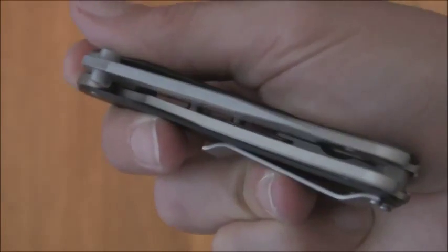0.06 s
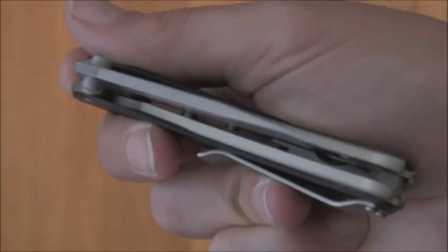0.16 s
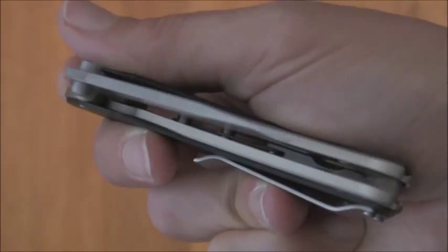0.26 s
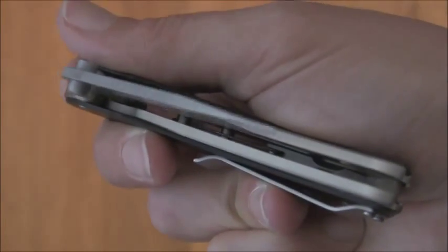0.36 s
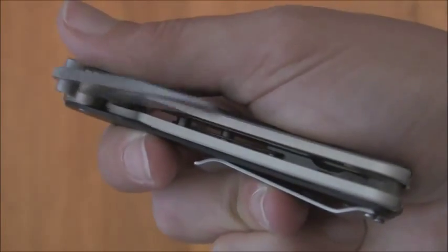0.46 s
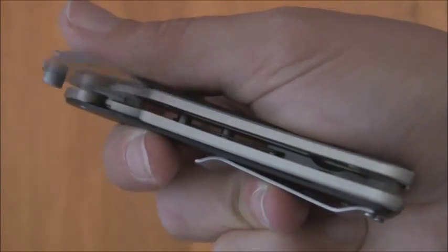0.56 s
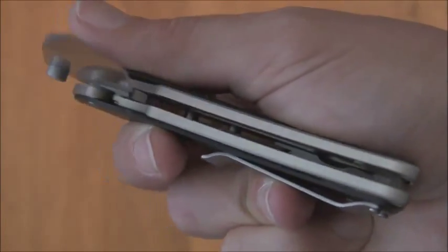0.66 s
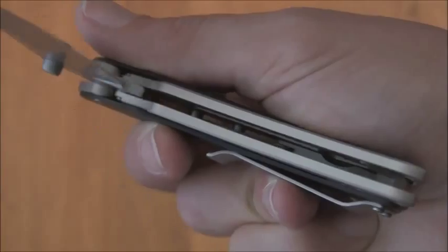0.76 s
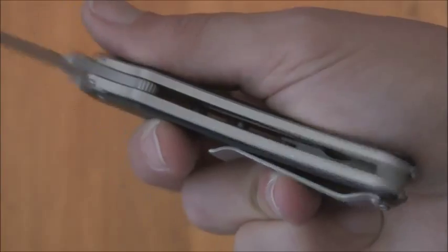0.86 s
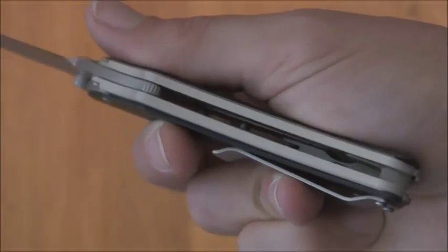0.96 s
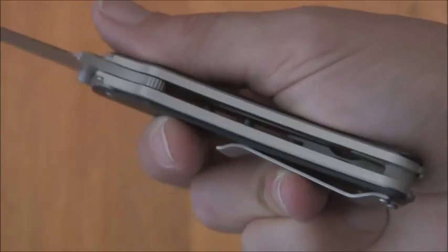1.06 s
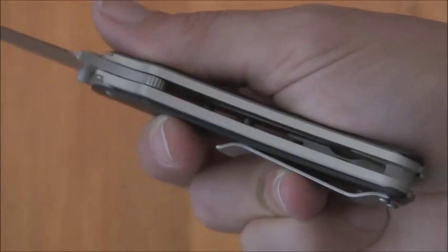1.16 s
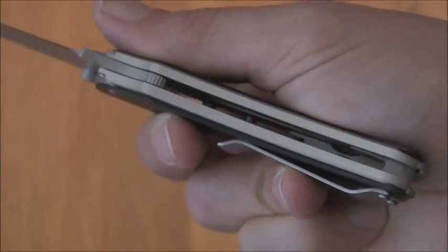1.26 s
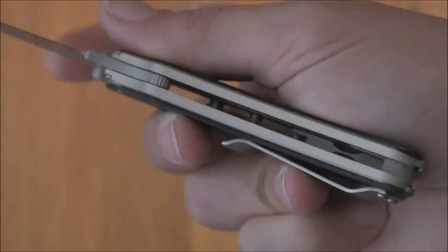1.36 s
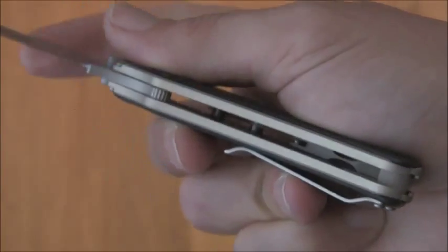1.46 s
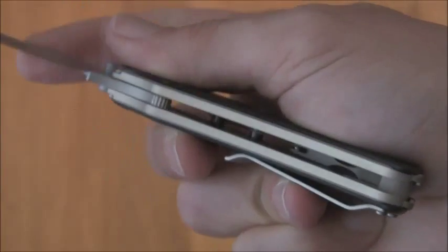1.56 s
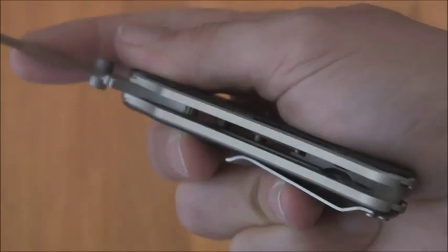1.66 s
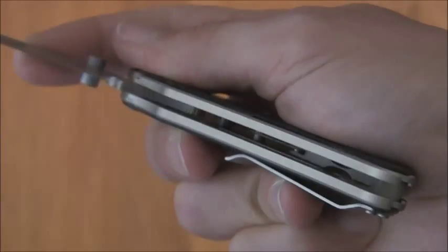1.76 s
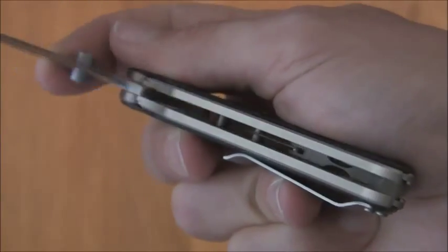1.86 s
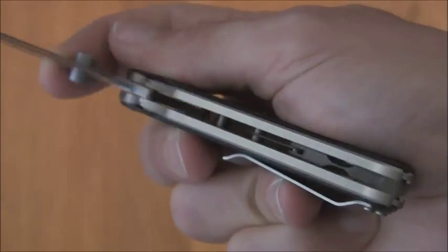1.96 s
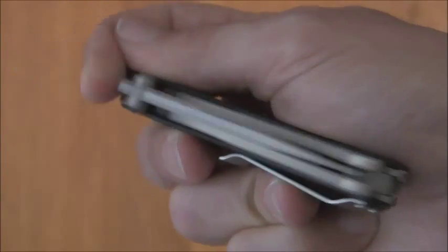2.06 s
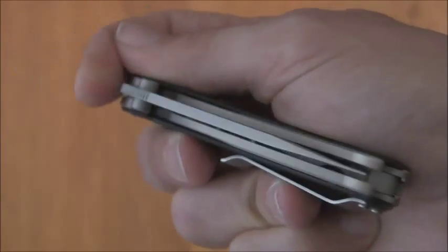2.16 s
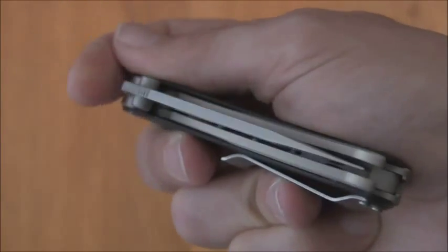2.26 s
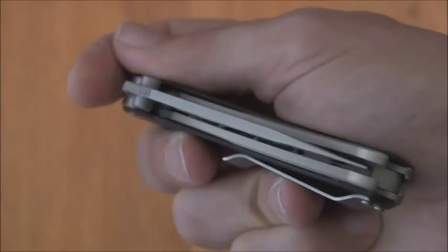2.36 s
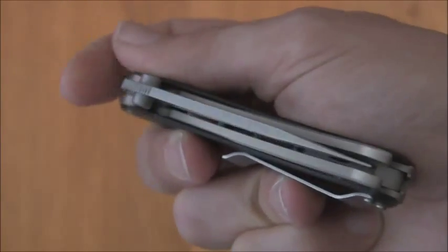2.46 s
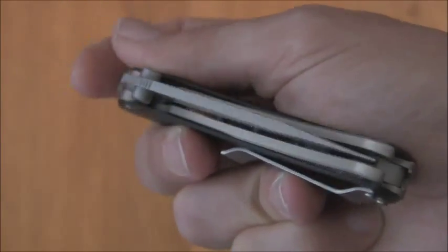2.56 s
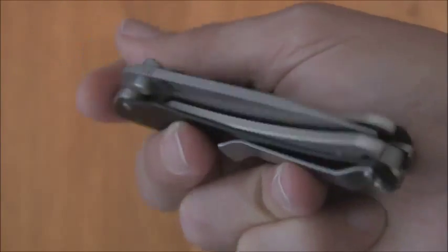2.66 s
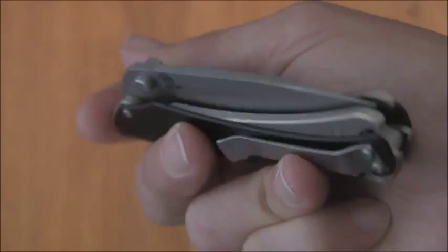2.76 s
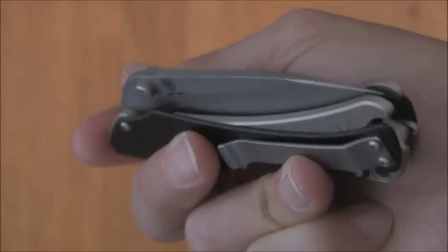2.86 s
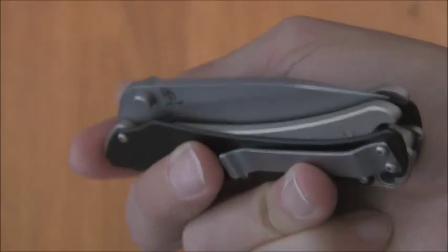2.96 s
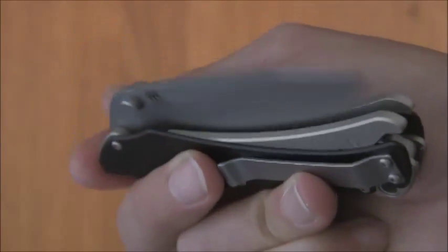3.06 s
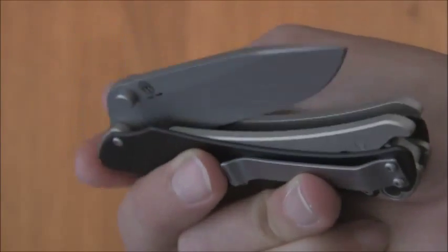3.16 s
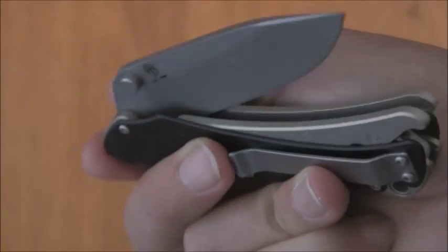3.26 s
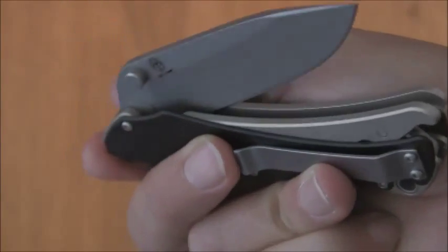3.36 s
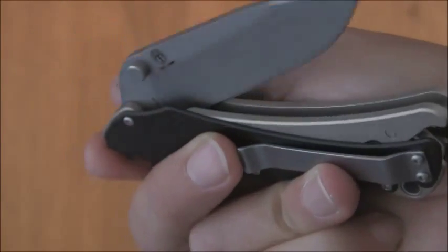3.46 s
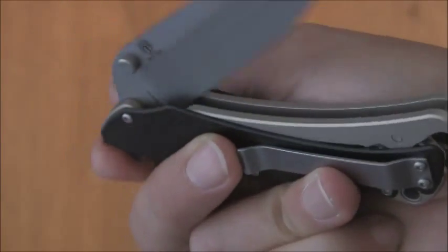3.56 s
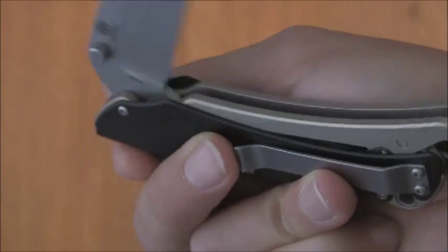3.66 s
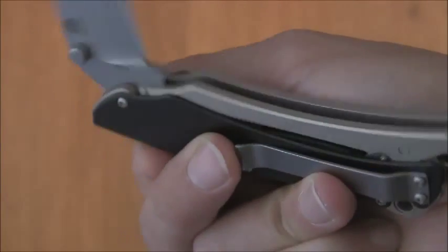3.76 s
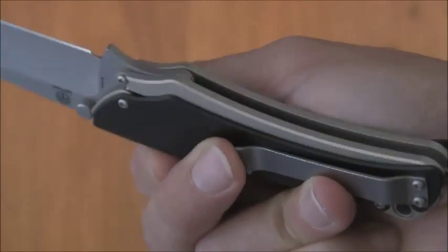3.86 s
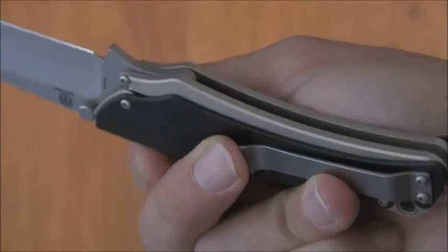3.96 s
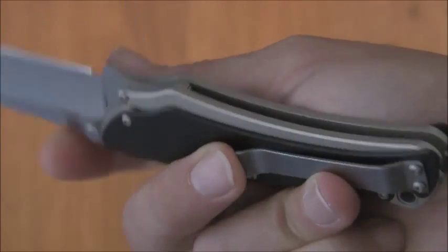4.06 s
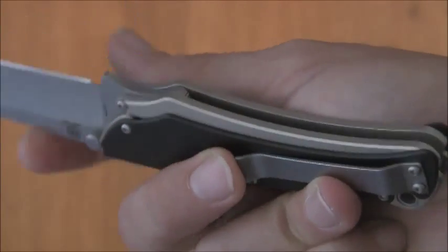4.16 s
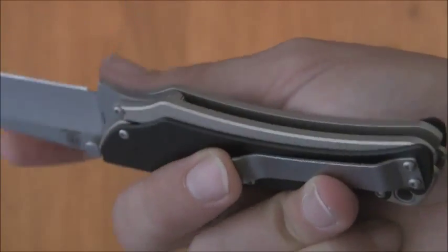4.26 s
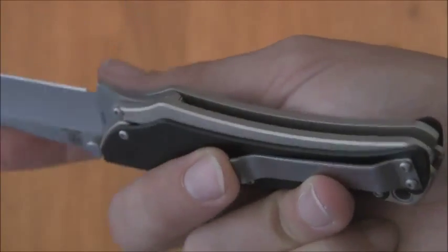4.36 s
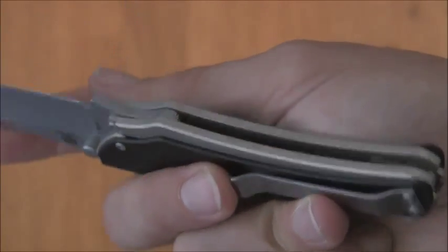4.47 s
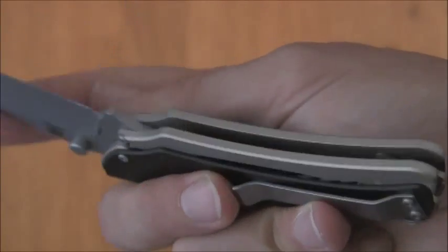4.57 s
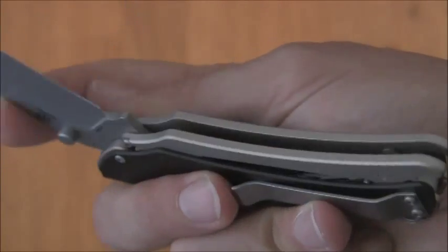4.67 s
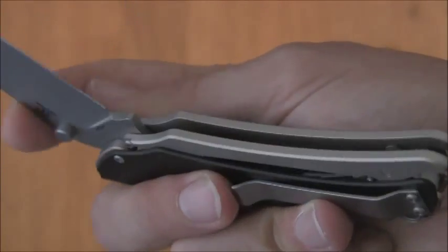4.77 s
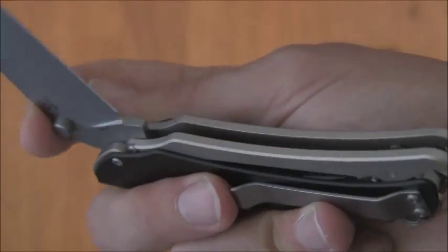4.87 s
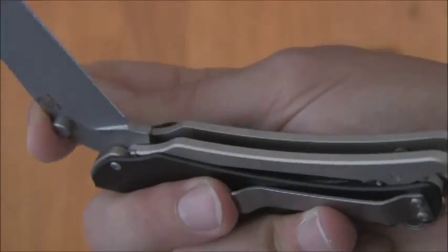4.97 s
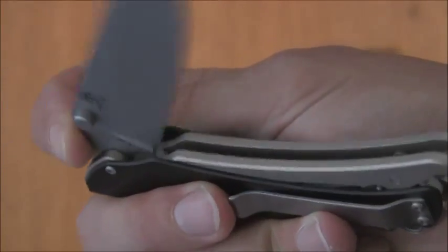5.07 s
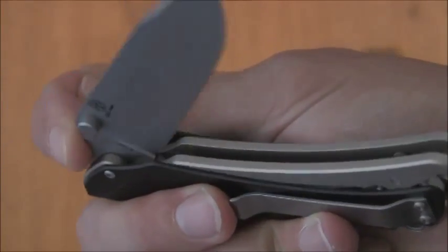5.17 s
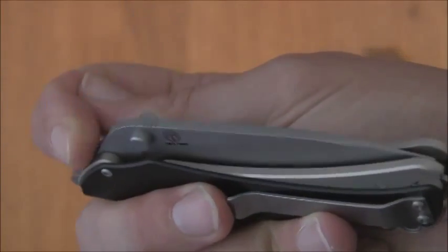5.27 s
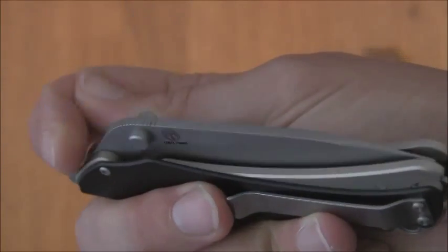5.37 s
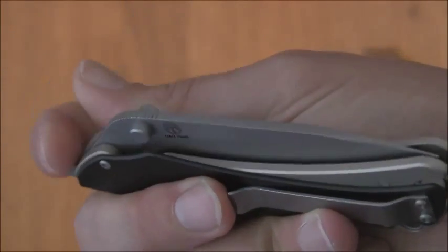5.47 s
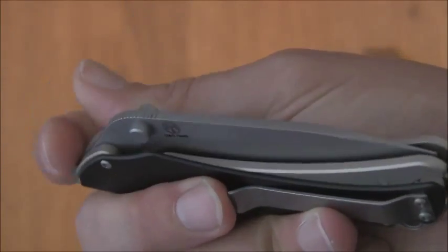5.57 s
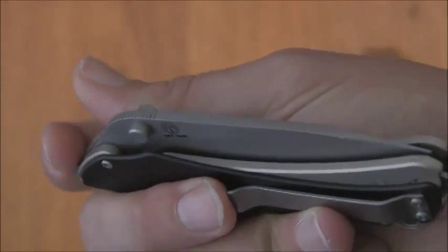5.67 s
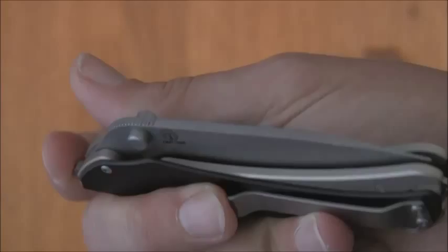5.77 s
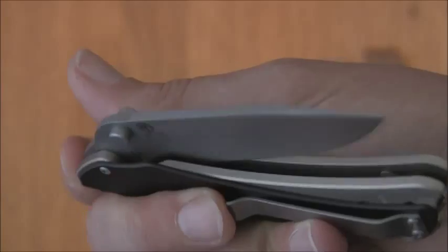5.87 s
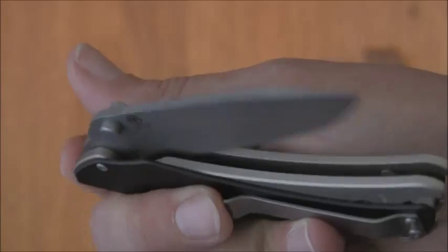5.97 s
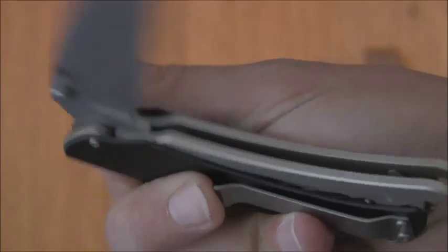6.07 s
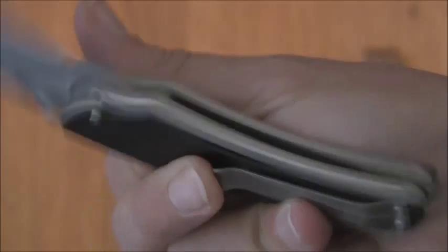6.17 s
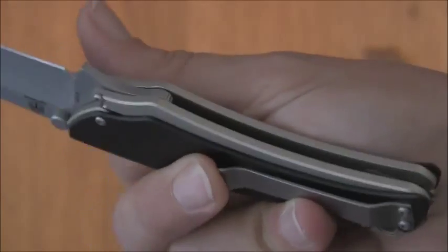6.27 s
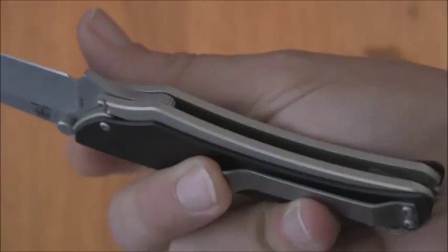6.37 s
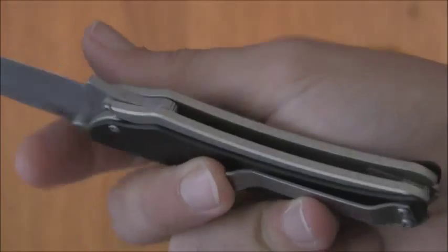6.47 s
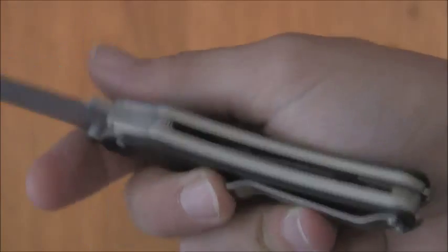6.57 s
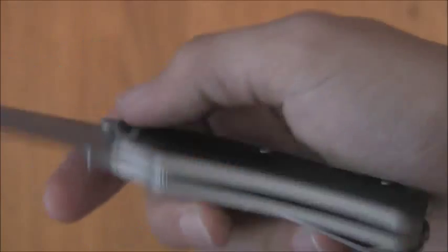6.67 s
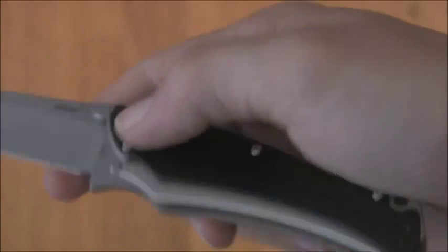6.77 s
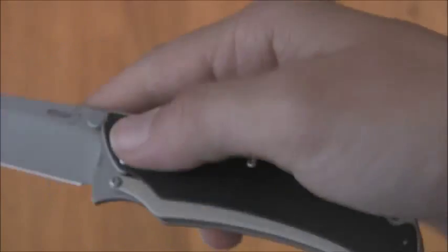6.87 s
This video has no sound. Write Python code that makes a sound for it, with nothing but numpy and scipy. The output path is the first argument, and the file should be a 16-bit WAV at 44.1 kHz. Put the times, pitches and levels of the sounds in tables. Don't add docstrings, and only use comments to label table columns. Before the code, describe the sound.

Five loud, hard metallic snaps of a folding knife opening and shutting, with faint clicks and rubs between, over low room rumble and hiss.

```python
import sys
import numpy as np
from scipy import signal
from scipy.fft import rfft, irfft
from scipy.io import wavfile
from scipy.ndimage import uniform_filter1d

SR = 44100
rng = np.random.default_rng(int(sys.argv[2]) if len(sys.argv) > 2 else 0)


def gain_from_decibels(decibels):
    exponent = np.asarray(decibels, float) / 20
    return 10 ** exponent


def file_out(sig):
    cols = np.atleast_2d(sig).T
    lim = np.clip(cols, -1, 1)
    pcm = np.round(lim * 32767).astype(np.int16)
    wavfile.write(sys.argv[1], SR, pcm)


N = 305613
BINS = np.arange(4097) * SR / 8192
LEFT_RIGHT = np.array([[1], [-1]])

# start_s, level_db, room_share_db, left_minus_right_db, overload_db
SNAPS = [
    (0.9147, 3, 3, 2, 9.5),
    (2.1054, 1.3, 1.5, -1.5, 5.5),
    (3.8403, 2, 4.5, 4.5, 9.5),
    (5.2807, -1, 0, -2, 4.5),
    (6.2001, 3.5, 2, 0.5, 12),
]
# frequency_hz, left_minus_right_db
KNIFE_SIDES = [(1500, -5.5), (2500, 5), (4500, -6.5), (8000, 0.5), (15000, -12)]


def snaps():
    # free_1_hz, free_2_hz, muted_1_hz, muted_2_hz, muting_db
    grips = [(5810, 7900, 5000, 12800, -4), (6100, 8550, 9500, 13000, -5), (8250, 12700, 5200, 7400, -5),
             (6940, 8800, 3300, 5600, -13.5), (4600, 12600, 3000, 6500, -5.5)]
    # thump_hz, thump_level_db, width_octaves, handle_mode_hz, mode_level_db
    thumps = [(850, -7.5, 0.67, 2450, -1), (900, -24, 1.3, 2500, -0.5), (197, -8, 1.3, 2270, 0),
              (250, -22, 2.2, 2420, 2), (1402, -9, 1.5, 2420, 4)]
    # tilt_db_per_octave, first_hz, first_db, second_hz, second_db
    sings = [(1, 2290, 9, 5900, 4), (0.5, 8170, 6, 11600, 3), (2, 2210, 11, 5300, 4), (0, 8200, 5, 4150, 5),
             (2.5, 2280, 12.5, 4830, 5)]
    # frequency_hz, density_db_per_hz
    lock_colour = [(1030, -41), (1900, -17), (2750, -12), (3350, -3), (4500, -8), (7500, -4), (14300, -6),
                   (16000, -13)]
    # frequency_hz, density_db_per_hz
    stop_colour = [(1030, -46), (1750, -20), (2400, -9.5), (3000, -12), (4400, -7), (5600, -4),
                   (13500, -6.5), (16000, -13.5)]
    total = 0
    for (s, db, room_db, pan_db, _), grip, thump, sing in zip(SNAPS, grips, thumps, sings):
        tilt_db, first_hz, first_db, second_hz, second_db = sing
        far_db = ring(stop_colour if is_closing(s) else lock_colour, tilt_db, 0.52)
        far_db = far_db + first_db * bump(first_hz, .075) + second_db * bump(second_hz, .075)
        snap = contact(s, db - 1.5, .03, 3.1, crack(grip), far_db, 1.2)
        snap = snap + knock(s, db, *thump)
        total = total + snap * gain_from_decibels(np.array([[pan_db / 2], [-pan_db / 2], [room_db]]))
    return total


def is_closing(s):
    return min(abs(s - 2.1), abs(s - 5.28)) < .3


def crack(grip):
    # frequency_hz, density_db_per_hz
    crack_colour = [(150, -50), (250, -32.5), (1750, -26), (2400, -14), (3050, -1.5), (4400, 1.5),
                    (14600, -1), (16000, -8)]
    free = sum(5.5 * bump(hz, .05) for hz in grip[:2])
    muted = sum(grip[4] * bump(hz, .07) for hz in grip[2:4])
    return along(crack_colour, BINS) + free + muted


def knock(s, db, thump_hz, thump_db, octaves, mode_hz, mode_db):
    palm_db = thump_db - 10 * (np.log2(np.maximum(BINS, 1) / thump_hz) / octaves) ** 2
    handle = gain_from_decibels(2 * mode_db) * bump(mode_hz, .14) ** 3
    power = gain_from_decibels(2 * np.maximum(palm_db, -90)) + handle
    blow = causal(10 * np.log10(power)) * np.sqrt(np.mean(power)) * gain_from_decibels(db + 19)
    pair = blow * gain_from_decibels(LEFT_RIGHT * along(KNIFE_SIDES, BINS) / 2)
    return np.pad(irfft(pair), ((0, 1), (int(s * SR), N)))[:, :N]


def rubs():
    # frequency_hz, density_db_per_hz
    open_colour = [(1030, -40), (1750, -8), (1940, -11.5), (2270, -4.5), (2540, -5), (3400, -1.5),
                   (5170, -3.5), (5790, 0), (6350, -5), (7660, -2), (11600, -4.5), (14500, -5.5),
                   (16300, -13)]
    # frequency_hz, density_db_per_hz
    shut_colour = [(1030, -36.5), (1750, -20.5), (2290, -7), (3150, -9.5), (4250, -7), (4940, -6.5),
                   (5680, 0), (6180, -5.5), (8250, -2.5), (9490, -3.5), (11600, -2.5), (14500, -10),
                   (16300, -18.5)]
    # frequency_hz, density_db_per_hz
    liner_colour = [(1030, -49), (1750, -22), (2530, -5.5), (3050, -9), (3410, -8.5), (4140, 2),
                    (5220, -16), (6000, -3.5), (6520, -9), (9790, -9), (12200, -12), (13800, -15),
                    (16000, -23)]
    total = 0
    for s, db, rise_ms, fall_ms, tilt_db, mode_hz in small_contacts():
        unlocking = min(abs(s - 1.64), abs(s - 4.55)) < .05
        colour = liner_colour if unlocking else shut_colour if is_closing(s) else open_colour
        steel_db = ring(colour, tilt_db, 1.0)
        touched_db = 9 * bump(mode_hz, 0.056)
        far_db = along(open_colour, BINS) if unlocking else steel_db + 0.44 * touched_db
        rub = contact(s, db, rise_ms, fall_ms, steel_db + touched_db, far_db, 2.5)
        total = total + rub * gain_from_decibels(np.array([[0], [0], [-2.5]]))
    return total


def small_contacts():
    # peak_s, level_db, fall_ms, tilt_db_per_octave, mode_hz
    rides = [
        (0.897, -28.5, 15, -1, 3500),
        (3.828, -25.5, 10, -0.5, 13150),
        (6.175, -34.5, 24, -3.5, 6995),
    ]
    # peak_s, level_db, rise_ms,
    # tilt_db_per_octave, mode_hz
    lead_ins = [
        (0.912, -27.5, 6, 4, 6000),
        (2.106, -25.5, 14, -1, 2870),
        (3.8395, -24, 5, 1, 3500),
        (5.281, -26, 12, -3.5, 7540),
        (6.2, -31.5, 4, -4, 4200),
    ]
    # peak_s, level_db, rise_ms, fall_ms, mode_hz
    clicks = [
        (0.9078, -9, 0.23, 1.2, 7950),
        (1.6352, -27, 1.8, .8, 4200),
        (1.639, -21.5, 1.2, 2.2, 9500),
        (1.645, -23, 1.2, 4, 3020),
        (3.833, -16, .4, 2.2, 13000),
        (4.548, -29, 1.5, 5.4, 4300),
        (4.552, -25, .6, 1.2, 7500),
        (4.561, -28, 2.5, 5.7, 3300),
        (6.1846, -25, .8, 14, 4200),
        (6.1938, -9, 1, 1.6, 3860),
    ]
    # peak_s, level_db, fall_ms, tilt_db_per_octave, mode_hz
    ticks = [(.61, -45.5, 6.4, -2, 2400), (.856, -35.5, 1.2, -9.5, 2600), (2.037, -48, 5.9, -3, 7010),
             (2.843, -44.5, 5.8, 1, 11300), (3.668, -43.5, 4, -3, 7000), (5.071, -43.5, 7.6, 0.5, 7070),
             (5.104, -50, 23, 2, 7030), (5.584, -45.5, 3, -13.5, 2500)]
    # peak_s, level_db, swell_ms, tilt_db_per_octave, mode_hz
    scuffs = [(1.852, -50.5, 6, -3, 6970), (2.766, -53.5, 5.3, -2, 3970), (5.125, -56, 16, -1.5, 10600),
              (5.233, -49, 8, 3, 10920), (5.904, -42, 8.6, -3, 2470), (6.087, -45, 15, -2.5, 7100),
              (6.135, -49.5, 22, -4.5, 3940), (6.75, -49, 9.5, -5, 14000), (6.85, -53, 28, -3.5, 2500)]
    events = [(s, db, 5.2, ms, tilt_db, hz) for s, db, ms, tilt_db, hz in rides]
    events += [(s, db, ms, .52, tilt_db, hz) for s, db, ms, tilt_db, hz in lead_ins]
    events += [(s, db, rise_ms, fall_ms, 4.5 + 0.18 * db, hz) for s, db, rise_ms, fall_ms, hz in clicks]
    events += [(s, db, .9, ms, tilt_db, hz) for s, db, ms, tilt_db, hz in ticks]
    events += [(s, db, ms, ms, tilt_db, hz) for s, db, ms, tilt_db, hz in scuffs]
    return sorted(events)


def contact(s, db, rise_ms, fall_ms, near_db, far_db, grit_db):
    before, size = int(SR * .07), 8192
    t_ms = 1000 * (np.arange(size) - before) / SR
    shape = gain_from_decibels(db) * np.exp(np.where(t_ms < 0, t_ms / max(rise_ms, .02), -t_ms / max(fall_ms, .05)))
    chatter = rng.standard_normal((2, size))
    roughness = gain_from_decibels(grit_db * (rng.exponential(size=size) + 2))
    grit = rfft(chatter * roughness * shape)
    rough_db = 10 * np.log10(uniform_filter1d(np.abs(grit) ** 2, size=90))
    coloured = [g * causal(near_db - r) for g, r in zip(grit, rough_db)]
    strength = np.sqrt(np.sum(shape ** 2))
    mid, side = (strength * c / np.sqrt(np.mean(np.abs(c) ** 2)) for c in coloured)
    apart = np.clip(BINS / 4500, .4, .9)
    pair = (mid + LEFT_RIGHT * apart * side) / np.sqrt(1 + apart ** 2)
    pair = pair * gain_from_decibels(LEFT_RIGHT * along(KNIFE_SIDES, BINS) / 2)
    delay = np.exp(-2j * np.pi * BINS * before / SR)
    spread = strength * delay * causal(far_db)
    start = int(s * SR) - before
    return np.pad(irfft(np.vstack([pair, spread])), ((0, 0), (start, N)))[:, :N]


def ring(colour, tilt_db, scatter_db):
    # frequency_hz, width_hz, level_db
    steel_modes = [(2220, 150, 3.5), (2560, 350, 1), (4200, 450, 1.5), (4680, 150, 2.5), (6000, 380, 0),
                   (6950, 200, 4), (7950, 130, 0.5), (8460, 150, 3.5), (10420, 300, 1.5), (10850, 300, 4),
                   (12600, 390, 3), (14000, 230, 5.5)]
    db = along(colour, BINS) + tilt_db * np.log2(np.maximum(BINS, 2000) / 5000)
    for (hz, width_hz, mode_db), chance in zip(steel_modes, rng.standard_normal(len(steel_modes))):
        db = db + (mode_db + scatter_db * chance) / (1 + (2 * (BINS - hz) / width_hz) ** 2)
    return db


def bump(hz, width):
    return 1 / (1 + ((BINS / hz - 1) / width) ** 2)


def causal(db):
    cepstrum = irfft(np.log(gain_from_decibels(np.maximum(db, db.max() - 51))))
    cepstrum[1:4096] *= 2
    cepstrum[4097:] = 0
    response = np.exp(rfft(cepstrum))
    return response / np.sqrt(np.mean(np.abs(response) ** 2))


def along(table, hz):
    points = np.array(table)
    return np.interp(np.log(np.maximum(hz, 1)), np.log(points[:, 0]), points[:, 1])


def room(x):
    # frequency_hz, t60_s
    decay_times = [(500, 0.36), (2500, 0.64), (5000, 0.59), (9000, 0.49), (16000, 0.32)]
    t = np.arange(SR) / SR
    hz, frame_s, cells = signal.stft(rng.standard_normal((2, SR)), SR, nperseg=256)
    cells = cells * gain_from_decibels(-60 * frame_s / along(decay_times, hz)[:, None])
    tail = signal.istft(cells, SR, nperseg=256)[1][:, :SR]
    tail = tail * (1 - np.exp(-(t / 0.0024) ** 2))
    tail = tail * gain_from_decibels(-5) / np.sqrt(np.sum(tail ** 2) / 2)
    return signal.fftconvolve(x, tail, axes=1)[:, :N]


def tone():
    # frequency_hz, density_db_per_hz
    tone_colour = [(12, -45.5), (20, -18.5), (38, -8), (133, -2.5), (197, -4), (300, -3), (335, -5.5),
                   (443, -6), (509, -9), (692, -11), (865, -14), (1140, -15), (2170, -20), (12600, -30),
                   (15800, -36)]
    # frequency_hz, likeness_0_to_1
    likeness = [(60, .39), (200, 0.4), (640, 0.2), (1400, .17), (6800, .06)]
    # frequency_hz, left_minus_right_db
    tone_sides = [(60, -1.5), (110, -0.5), (200, -3.5), (380, -2), (700, -3.0), (1290, -2), (2380, -2),
                  (4400, -1.0), (8120, -2), (15000, -2.5)]
    # frequency_hz, width_hz, level_db
    machinery = [(148.7, 8, -64), (198.6, 8, -63.5)]
    hz = np.arange(N // 2 + 1) * SR / N
    alike = np.clip(along(likeness, hz), 0, 1)
    mid, side = rfft(rng.standard_normal((2, N)))
    pair = np.sqrt(1 + alike) * mid + LEFT_RIGHT * np.sqrt(1 - alike) * side
    pair = pair * gain_from_decibels(LEFT_RIGHT * along(tone_sides, hz) / 2)
    steady = level(irfft(pair * gain_from_decibels(along(tone_colour, hz)), N), -47.5)
    for hum_hz, width_hz, db in machinery:
        steady = steady + level(irfft(pair / (1 + (2 * (hz - hum_hz) / width_hz) ** 2), N), db)
    swell = np.interp(np.arange(N) / SR, np.arange(24) * .3, rng.standard_normal(24))
    rumble = signal.sosfiltfilt(signal.butter(1, 500, fs=SR, output="sos"), steady)
    return steady + (gain_from_decibels(.8 * swell) - 1) * rumble


def level(x, db):
    return x * gain_from_decibels(db) / np.sqrt(np.mean(x ** 2))


def scene():
    knife = rubs() + snaps()
    direct, room_feed = knife[:2], knife[2:]
    return direct + room(room_feed) + tone()


def roll_off(x):
    return signal.sosfilt(signal.butter(12, 16470, fs=SR, output="sos"), x)


def record(dry):
    t = np.arange(N) / SR
    fast_db, slow_db, bass_db = np.zeros((3, N))
    for s, *_, dive_db in SNAPS:
        hold_s = 0.094 + 0.0031 * dive_db
        thin_db = -0.7 + 0.9 * dive_db
        since = np.maximum(t - s - .0019, 0)
        attack = 1 - np.exp(-since / 0.000274)
        fast_db += attack * dive_db * np.clip(1 - (since / hold_s) ** 0.83, 0, 1)
        creep_db = 8 * np.exp(-since / 0.95)
        slow_db = (1 - attack) * slow_db + attack * creep_db
        bass_db += attack * thin_db * np.clip((1.1 * hold_s - since) / .015, 0, 1)
    gain = gain_from_decibels(-fast_db - slow_db)
    bass = signal.sosfiltfilt(signal.butter(1, 400, fs=SR, output="sos"), dry)
    offset = signal.lfilter([1, -1], [1, -np.exp(-1 / (SR * .15))], gain_from_decibels(-48.5) * (1 - gain))
    heard = (dry - (1 - gain_from_decibels(-bass_db)) * bass) * gain + offset
    heard = np.tanh(heard / 1.3) * 1.3
    heard = signal.sosfilt(signal.ellip(9, .3, 50, 15800, fs=SR, output="sos"), heard)
    return roll_off(np.clip(heard, -1, 1))


dry = scene()
out = record(dry)
file_out(out)
```